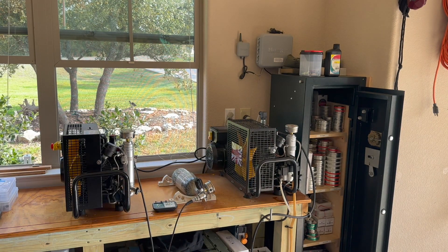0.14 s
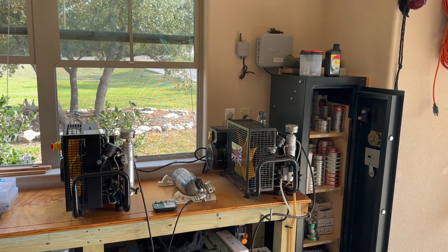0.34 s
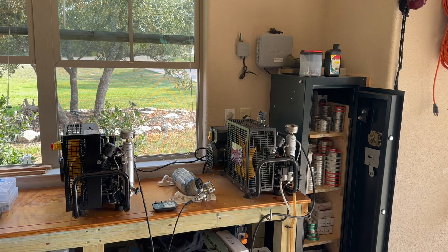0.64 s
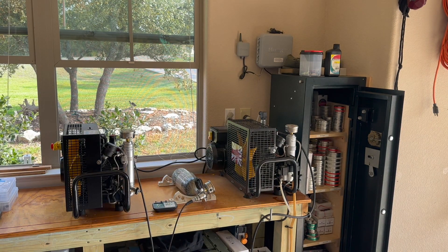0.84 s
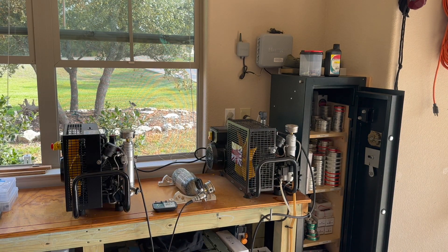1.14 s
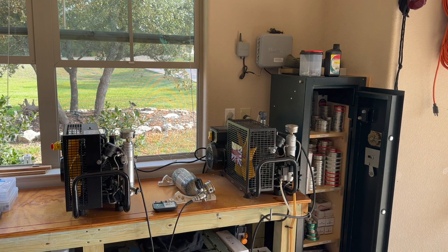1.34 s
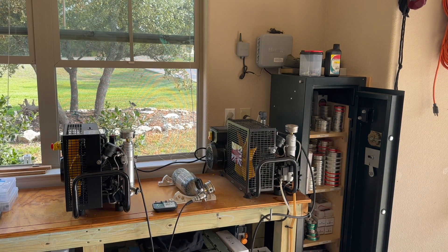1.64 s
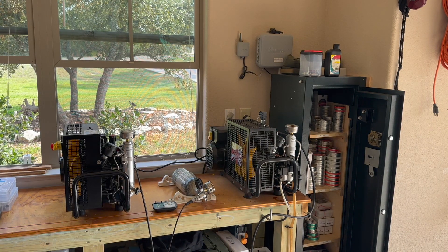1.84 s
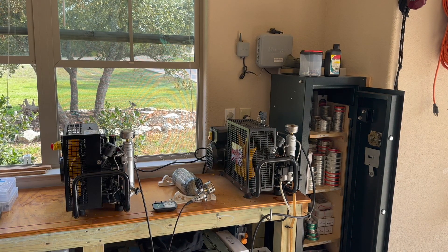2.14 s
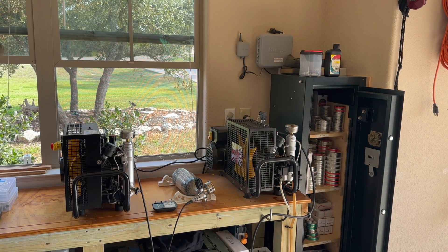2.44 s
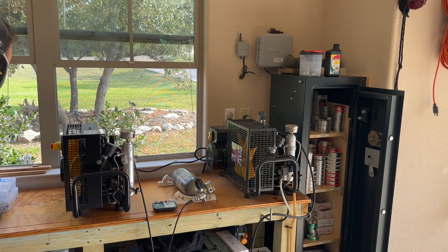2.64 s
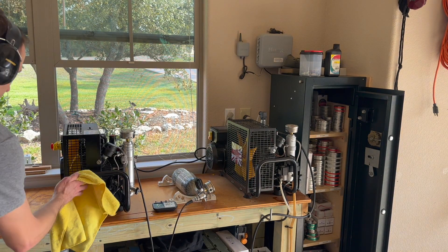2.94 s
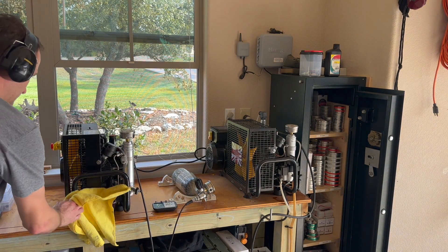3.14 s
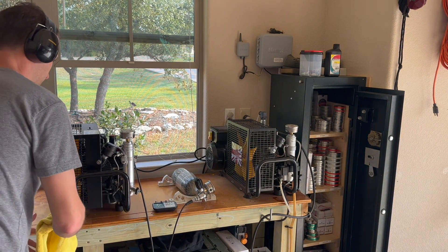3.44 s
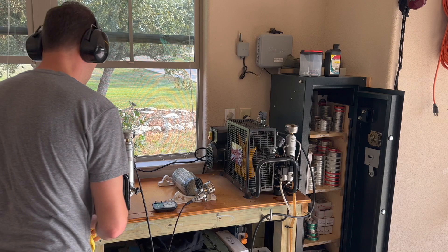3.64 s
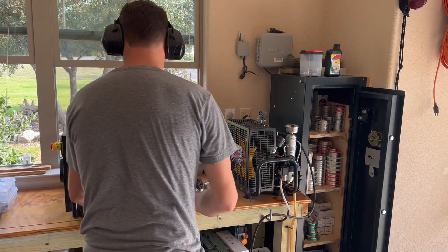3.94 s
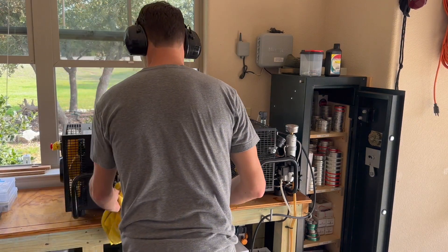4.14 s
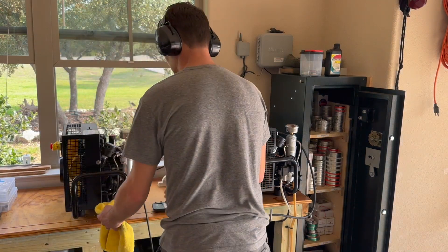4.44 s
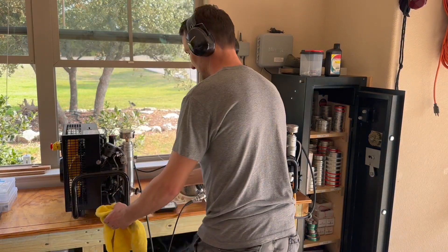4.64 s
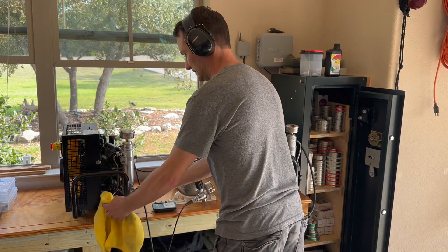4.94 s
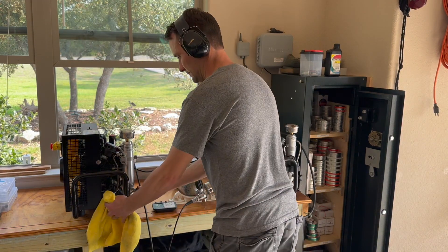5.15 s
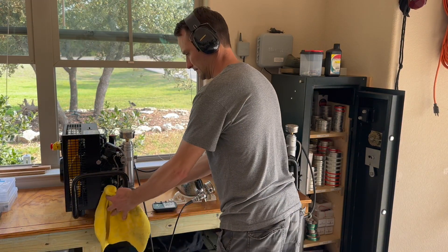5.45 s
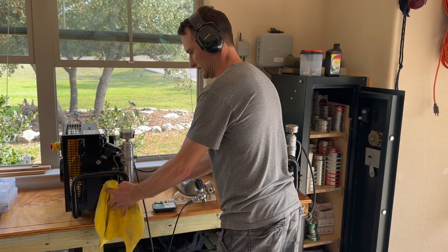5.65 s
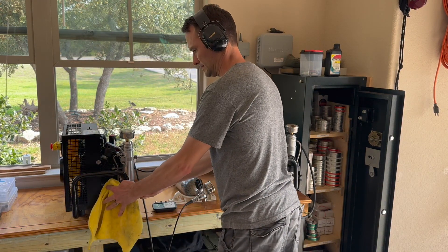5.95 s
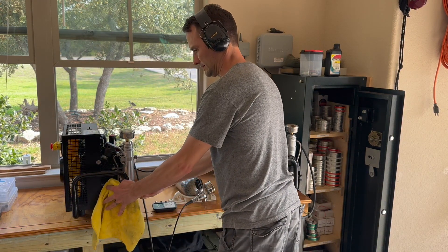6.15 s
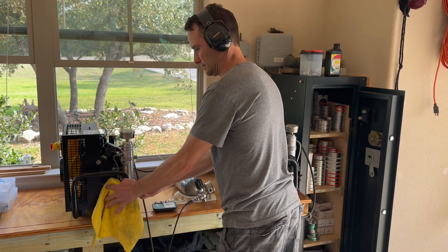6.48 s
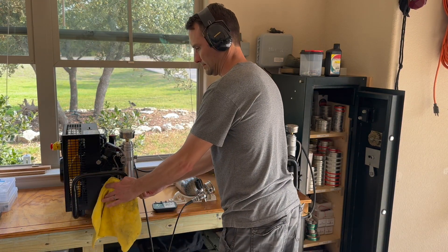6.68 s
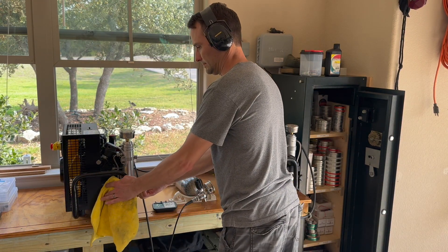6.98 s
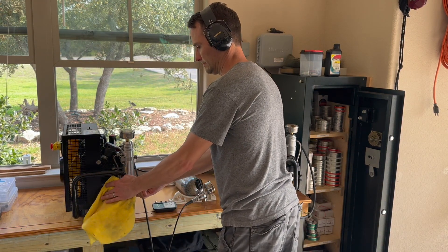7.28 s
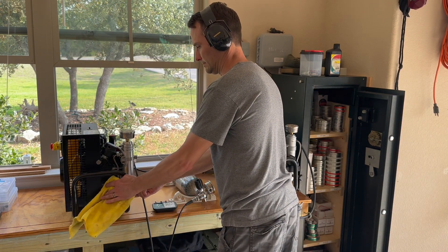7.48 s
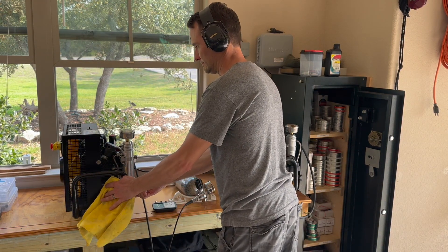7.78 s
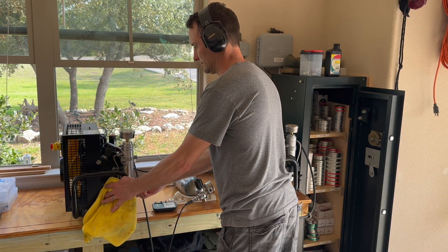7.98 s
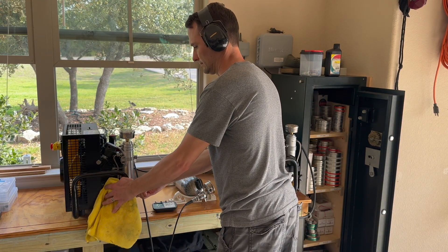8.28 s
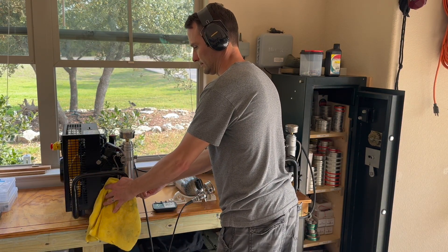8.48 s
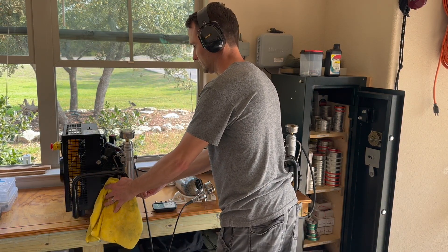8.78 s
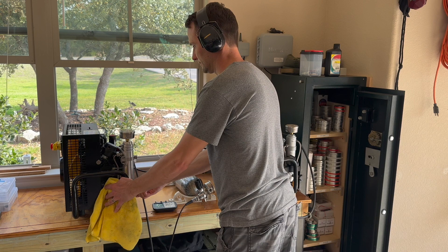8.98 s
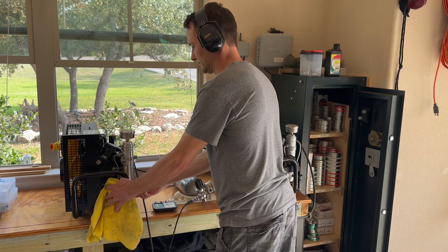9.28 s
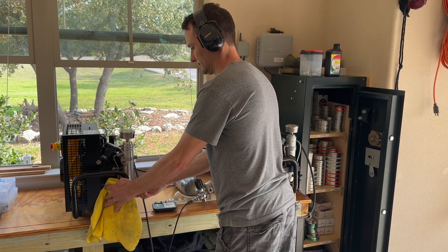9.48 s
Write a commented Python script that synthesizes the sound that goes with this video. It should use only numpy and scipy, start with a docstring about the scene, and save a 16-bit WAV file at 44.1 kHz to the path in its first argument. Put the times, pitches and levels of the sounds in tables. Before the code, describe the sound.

In a small workshop, compressed air blows from a compressor's drain valve in a loud, bright, slightly metallic hiss, captured by a phone a few metres away. Faint thuds and a low rumble lie beneath. Someone steps in front, briefly dulling the treble, with a sharp click around four and a half seconds. Later a cloth enters the jet, with a hard slap and roaring, fluttering gusts while the hiss continues to the end.

```python
"""Air blow-off in a workshop

Compressed air blows off through the drain valve of a compressor on a bench, a few metres from a phone:
turbulent hiss, as bands of noise coloured by the jet and by ringing metal. A person steps in front, shading
the hiss, then holds a cloth into the jet: the colour changes and low noise roars as the air catches it.
Footfalls thud as dying rings; bench and walls echo it all, with a low rumble of noise beneath."""
import sys
import numpy as np
from scipy import signal
from scipy.fft import rfft, irfft, next_fast_len
from scipy.io import wavfile
from scipy.ndimage import uniform_filter1d, map_coordinates

SR = 44100
rng = np.random.default_rng(int(sys.argv[2]) if len(sys.argv) > 2 else 0)


def waveform_to_disk(signal):
    """Save audio, clipped to [-1, 1], as 16-bit WAV at the path in sys.argv[1]."""
    frames = np.transpose(np.atleast_2d(signal))
    scaled = np.clip(frames, -1, 1) * 32767
    samples = np.round(scaled).astype(np.int16)
    wavfile.write(sys.argv[1], SR, samples)


N = 424241
SIZE = next_fast_len(N + SR)  # room for the tail of the echoes
T = np.arange(N) / SR  # seconds
HZ = np.maximum(np.arange(SIZE // 2 + 1) * SR / SIZE, 1)

# Steady buffeting of the bench, and the shop. Each row: time in seconds, roar level in dB before its flapping,
# brightness in dB (added above about 600 Hz, taken off below), rumble level in dB before it wavers.
BUFFETING = [(0, -42, 0.5, -54), (2.2, -39.5, -0.5, -55), (3.9, -42.5, 2, -52.5), (4.8, -41.5, 3, -54),
             (6.9, -37.5, -2.5, -58), (7.6, -42, 0, -51), (8.1, -35, 4.5, -56), (8.9, -41.5, 3.5, -58),
             (8.96, -44, 5.5, -54), (9.03, -48, 9, -55), (9.2, -41, 8, -62), (9.4, -43.5, 5.5, -58),
             (9.62, -44, -1, -65)]


def undb(db):
    """Amplitude ratio of a level: 20 dB is a factor of ten."""
    return 10 ** (np.asarray(db) / 20)


def over_time(table):
    """Linear interpolation in time: each column of (s, value, ..) as one value a sample."""
    s, *columns = np.transpose(table)
    return [np.interp(T, s, column) for column in columns]


def over_hz(table, hz):
    """Interpolation in log frequency: each column of (Hz, value, ..) at the given frequencies."""
    at, *columns = np.transpose(table)
    return [np.interp(np.log(hz), np.log(at), column) for column in columns]


def noise(gain):
    """Spectral shaping: white Gaussian noise times a gain at each frequency."""
    return irfft(rfft(rng.standard_normal(SIZE)) * gain, SIZE)[:N]


def unit(x):
    """Normalisation to a root mean square of 1."""
    return x / np.sqrt(np.mean(x ** 2))


def walk(rate):
    """Slow random modulation: levels drawn at a rate per second, smoothed twice; spread near 1."""
    hold = int(SR / rate)
    levels = np.repeat(rng.standard_normal(N // hold + 1), hold)
    smooth = uniform_filter1d(uniform_filter1d(levels, hold), hold)
    return 1.377 * smooth[:N]


def rumble():
    """Broadband low noise of the shop, whose level wavers by slow random modulation."""
    # Rumble spectrum. Each row: frequency in Hz, relative density in dB.
    rumble_colour = [(12, -43), (20, -11), (70, 7.5), (92, 7.5), (151, -3), (220, -16), (250, -3.5),
                     (320, -1), (550, -120)]
    level_db = over_time(BUFFETING)[2] + 1.7 * walk(4.6)
    return unit(noise(undb(over_hz(rumble_colour, HZ)[0]))) * undb(level_db)


def steps():
    """Impact sound: each blow is an exponentially dying sine mixed with noise in a band round its pitch."""
    # Footfalls, knocks and a slap of the cloth. Each row: start in seconds, onset level in dB,
    # pitch in Hz, time to decay by 60 dB in seconds, share of ring from 0 (rustle) to 1 (clean).
    blows = [(.612, -34, 200, 0.1, .3), (.614, -40, 600, .2, 0), (.742, -36, 480, .07, .1),
             (2.782, -38, 150, 0.13, 0), (4.119, -39, 260, 0.13, 0), (4.454, -28, 480, .035, .8),
             (4.453, -13, 2600, .01, .95), (4.752, -31, 600, .024, .8), (7.365, -19, 1800, .03, .4),
             (7.384, -15, 900, .02, .6), (7.385, -11, 2300, .02, .6), (4.478, -39, 200, 0.1, .3),
             (4.79, -44, 200, .08, 0)]
    out, t = np.zeros(N), T[:SR // 4]
    for s, db, hz, t60, ring in blows:
        band = signal.butter(1, [hz / 2.2, hz * 1.8], "band", fs=SR, output="sos")
        rustle = unit(signal.sosfilt(band, rng.standard_normal(len(t))))
        thud = np.sqrt(2 * ring) * np.sin(2 * np.pi * hz * t) + np.sqrt(1 - ring) * rustle
        attack = np.minimum(t / 0.0005, 1)
        start = int(s * SR)
        out[start:start + len(t)] += thud * undb(db - 60 * t / t60) * attack
    return out


def gusts():
    """Exponential growth and decay: power of the gusts and of their upper edge, summed over the gusts."""
    # The jet catches the cloth. Each row: peak time in seconds, roar level in dB before rounding, brightness
    # and flapping, swell in dB per second, fade in dB per second, level above the split in dB over the rest.
    catches = [(4.1, -40, 58, 62, 0), (6.68, -37, 72, 49, 3), (7.25, -28.5, 45, 30, -3),
               (7.385, -20, 85, 33, 0.5), (7.95, -34, 6.5, 96, -3), (8.87, -32.5, 21, 150, -1),
               (8.915, -31, 70, 600, -8), (9.0, -39.5, 100, 62, -8), (9.56, -31, 250, 60, 0)]
    round_s = 0.012  # averaging blunts the peaks
    power = 0
    for s, db, swell, fade, edge_db in catches:
        fall_db = np.where(T < s, swell * (s - T), fade * (T - s))
        power = power + np.outer([1, undb(edge_db)], undb(db - fall_db)) ** 2
    return uniform_filter1d(power, int(round_s * SR))


def flap():
    """Random amplitude modulation at two rates: uneven flapping."""
    return undb(.6 * walk(25) + 1.1 * walk(70))


def roar():
    """Low turbulent buffeting plus the cloth's gusts, as noise whose halves are weighed by brightness."""
    # Spectrum of the steady buffeting. Each row: frequency in Hz, relative density in dB.
    body_colour = [(35, -41), (60, -22.5), (292, -2.5), (617, 0), (797, -3), (897, -2.5), (1120, -2.5),
                   (2000, -4), (3500, 0), (4550, -43), (7700, -120)]
    # Spectrum of the gusts in the cloth. Each row: frequency in Hz, relative density in dB.
    cloth_colour = [(29, -46), (50, -15), (359, -4.5), (620, -2), (802, -2), (874, -3), (1130, 0),
                    (1560, -3.5), (1950, -1), (2600, -3.5), (3200, -7), (4200, -21), (6600, -120)]
    split_hz = 1800  # the edge of the gusts lies above this
    roar_db, bright_db, _ = over_time(BUFFETING)
    # shares of power
    upper = 1 / (1 + (600 / HZ) ** 2)
    edge = 1 / (1 + (split_hz / HZ) ** 6)

    colour = undb(over_hz(body_colour, HZ)[0])
    dark = undb(-bright_db) * noise(colour * np.sqrt(1 - upper))
    bright = undb(bright_db) * noise(colour * np.sqrt(upper))
    body = unit(dark + bright) * undb(roar_db)

    colour = undb(over_hz(cloth_colour, HZ)[0])
    low = noise(colour * np.sqrt(1 - upper))
    middle = noise(colour * np.sqrt(upper * (1 - edge)))
    high = noise(colour * np.sqrt(upper * edge))
    full, thin = np.sqrt(gusts()) / np.std(low + middle + high)
    cloth = full * (undb(-bright_db) * low + undb(bright_db) * middle) + thin * high
    return body * flap() + cloth * flap()


def shade():
    """Acoustic shadow: treble loss in dB, one smooth Gaussian dip for each crossing."""
    # Body, arm or cloth crossing the line to the phone. Each row: centre in seconds, treble loss in dB,
    # half length in seconds (to 1/e of the loss).
    crossings = [(3.03, 3, 0.1), (4.02, 7.5, 0.15), (4.483, 1.5, .04), (5.01, 4, 0.18), (5.487, 3.5, 0.083),
                 (6.364, 3.5, 0.15), (8.95, 2.5, 0.045)]
    return sum(loss_db * np.exp(-((T - s) / half) ** 2) for s, loss_db, half in crossings)


def jet():
    """Turbulent mixing noise: neighbouring bands gust together and flicker alone, coloured by resonances."""
    # Drift of the hiss. Each row: time in seconds, hiss level in dB before colour and gusting, then in dB
    # over the hiss: 2.5-5 kHz, below 2.5 kHz, above 12 kHz.
    drift = [(0, -17.5, -2.5, -1, 0), (1.1, -19, -0.5, 1.5, 2), (2.3, -18.5, -0.5, 2, 2.5),
             (3.5, -19, -1, 2, 3), (4.5, -20.5, 2.5, 3.5, 4), (4.8, -20, 1.5, 1.5, 5),
             (5.3, -23, 2.5, 8, 7), (5.55, -21, 0.5, 6.5, 6.5), (5.7, -21.5, 4, 5.5, 4),
             (6.1, -17, 1.5, 0.5, -0.5), (6.55, -16, 1, -1, -1), (6.72, -14.5, -2, -2, -2.5),
             (7.0, -17, 1.5, -0.5, -1.5), (7.2, -15, -2, -11, 0.5), (7.5, -15, -4, -1, -1),
             (7.95, -17, -4.5, -6, -0.5), (8.6, -17, -3.5, -1, 1.5), (8.9, -17, -2, -13, 2.5),
             (8.97, -15.5, -6.5, -6, -1), (9.08, -16.5, -4.5, -4, 1.5), (9.17, -15, -4, -6, -3),
             (9.28, -15.5, -4.5, -2, -2.5), (9.45, -15.5, -3.5, -2, -1.5), (9.62, -16, -6, -5, -0.5)]
    # Jet spectrum. Each row: frequency in Hz, gain in dB with the jet free, with the person, with the cloth.
    jet_colour = [(900, -22, -22, -22), (1550, -14, -14.5, -14), (1800, -10, -10, -9), (2350, -9, -8, -6.5),
                  (2550, -4, -3.5, -3), (2950, -4.5, -2, -2), (3150, -1, 0, 0), (4050, -2, -1, 0),
                  (4700, -0.5, -1, 0), (6000, -1.5, -2, 0), (7050, 0.5, -1, 1), (7700, -2.5, -1.5, 0.5),
                  (8600, 1, 1, 2), (9600, -2, -0.5, 0), (10400, -2, -1.5, 0), (11700, -1, -1, -1),
                  (12100, 1.5, 0.5, -1), (13000, 4.5, 3.5, 2), (14000, 1, 1.5, 2), (15000, 1, 1.5, 3),
                  (15600, 3.5, 4, 5)]
    # Valve, frame and bench ring with the jet. Each row: frequency in Hz, width in Hz,
    # boost in dB with the jet free, with the person, with the cloth.
    resonances = [(1350, 60, 4, 2, 0), (1810, 60, 4, 6, 1), (1945, 60, 4, 4, 4), (2200, 60, 1, 4, 2),
                  (2560, 70, 3, 3.5, 1.5), (2760, 60, 5, 1, 2), (3145, 40, 5, 5, 5), (3345, 40, 7, 3, 2),
                  (3610, 30, 5, 3, 2), (3875, 45, 7.5, 3, 2), (4185, 60, 3, 5, 3), (4625, 55, 10, 3, 2),
                  (4830, 60, 5, 5, 1), (5070, 60, 3, 1, 0), (5410, 60, 2, 3, 4), (5615, 35, 5, 3, 5),
                  (5800, 60, 4, 4, 2), (6100, 30, 4, 3, 4), (6390, 70, 4, 5, 4), (6595, 30, 6, 5, 5),
                  (7150, 80, 1, 4, 2), (7410, 70, 0, 3, 1), (7840, 70, 0, 4, 2), (8250, 90, 1, 2, 4),
                  (8630, 80, 3.5, 1.5, 0), (9130, 90, 0, 3, 2), (12790, 80, 2, 2, 1), (12945, 90, 4, 4, 2),
                  (13640, 90, 2, 1, 1), (14490, 100, 3, 2, 2), (14990, 80, 2, 1, 1), (15550, 90, 2, 1, 2)]
    # Who is at the valve. Each row: time in seconds, stage (0 jet free, 1 person close in front,
    # 2 cloth pressed into the jet).
    stages = [(0, 0), (3.65, 0), (3.9, 1), (4.2, 1), (4.35, .6), (4.8, .6), (4.95, 1), (6.6, 1), (6.85, 2),
              (9.62, 2)]
    flicker_db, flicker_rate = .75, 22  # spread in dB, draws per second

    hiss_db, lower_db, body_db, top_db = over_time(drift)
    ring_db = sum(np.outer(dbs, 1 / (1 + (2 * (HZ - hz) / width) ** 2)) for hz, width, *dbs in resonances)
    colours = undb(over_hz(jet_colour, HZ) + ring_db)
    # crossfade between the colours of neighbouring stages
    stage = over_time(stages)[0]
    shares = np.array([np.maximum(1 - abs(stage - k), 0) for k in range(len(colours))])

    gust_db = 0.34 * walk(18) + 0.54 * walk(45)
    loss_db = shade()
    edges_hz = [-SR, 1500, 2500, 3700, 5000, 6500, 8200, 10000, 12000, 14000, SR]
    follows = [body_db, body_db, lower_db, lower_db, 0.71 * lower_db, 0, 0, .5 * top_db, top_db, top_db]
    # the longer waves suffer a smaller share of the loss
    shaded = [.47, .47, .49, .49, .8, 1, 1, 1, 1, 1]
    out = 0
    for lo, hi, follow_db, share in zip(edges_hz, edges_hz[1:], follows, shaded):
        # bands overlap over 600 Hz at constant power
        band = np.clip(np.minimum(HZ - lo, hi - HZ) / 600 + .5, 0, 1) ** .5
        seed = rfft(rng.standard_normal(SIZE)) * band
        hiss = np.sum(shares * irfft(seed * colours, SIZE)[:, :N], axis=0)
        level_db = hiss_db + follow_db - share * loss_db + gust_db
        out = out + hiss * undb(level_db + flicker_db * walk(flicker_rate))
    return out


def bounced(x):
    """Comb-filter interference with a later copy off the person; peaks and dips slide as the path changes."""
    # Reflection off the moving body. Each row: time in seconds, extra path in metres,
    # level in dB relative to the direct sound.
    reflection = [(3.2, 1.2, -30), (3.7, .8, -10), (4.1, .45, -8), (4.5, .7, -9), (4.9, .5, -11),
                  (5.4, .66, -13), (5.8, .5, -12), (6.6, .6, -16), (7.4, .5, -17), (8.6, .58, -17),
                  (9.62, .5, -18)]
    metres, db = over_time(reflection)
    late = map_coordinates(x, [(T - metres / 343) * SR], order=5, mode="mirror")  # sound at 343 m/s
    return (x + undb(db) * late) / np.sqrt(1 + undb(db) ** 2)


def path():
    """Room response: spectrum of direct sound, echoes and decaying tail; and the phases of a second tail."""
    # Bench and wall echoes. Each row: delay in seconds, level in dB relative to the direct sound.
    echoes = [(.0036, -19.5), (.0041, -40), (.0052, -18.5)]
    t60_s, tail_db, tail_start_s = .4, -13, .006  # tail energy in dB relative to the direct sound
    t = T[:SR // 2]
    tails = rng.standard_normal((2, len(t))) * undb(-60 * t / t60_s) * (t > tail_start_s)
    response = unit(tails[0]) / np.sqrt(len(t)) * undb(tail_db)
    response[0] = 1
    for s, db in echoes:
        response[int(s * SR)] += undb(db)
    response /= np.sqrt(np.sum(response ** 2))
    return rfft(response, SIZE), np.exp(1j * np.angle(rfft(tails[1], SIZE)))


def scene():
    """Superposition of the sources in two channels with partial coherence between them."""
    # The two channels. Each row: frequency in Hz, likeness from 0 to 1, left minus right in dB.
    ports = [(60, .98, 0), (150, .97, .5), (300, .91, 1), (700, .6, 1.4), (1400, .6, 0), (2600, .5, 2),
             (3500, .4, 4), (7400, .4, 5), (8200, .85, 0), (9600, .7, 0), (10400, 1, 0), (11800, 1, 0),
             (12700, .8, 0), (13700, 1, 0), (15000, 1, 0), (15700, .7, 0)]
    # Phase of the right channel against the left: mirror image at 10.4-11.8 kHz, alike at 13.7-15 kHz.
    # Each row: frequency in Hz, lead in turns.
    lead = [(60, 0), (700, -.1), (2000, -.1), (3000, -.3), (4600, .15), (7400, -.3), (8000, 0), (9100, .06),
            (10400, .5), (11800, .5), (13700, 1), (15000, 1), (15600, 1.15)]
    # the scattered sound wanders in time, so that its interference with the rest does not stand still
    drift_s = .00012
    dry = rfft(rumble() + steps() + roar() + bounced(jet()), SIZE)
    like, pan_db = over_hz(ports, HZ)
    like = np.clip(like, 0, 1)
    left, scattered = path()
    # the right hears the same path turned in phase, plus scattered sound of its own
    right = like * left * np.exp(2j * np.pi * over_hz(lead, HZ)[0])
    gains = np.array([left * undb(pan_db / 2), right * undb(-pan_db / 2)])
    out = irfft(dry * gains, SIZE)[:, :N]
    own = irfft(dry * np.sqrt(1 - like ** 2) * scattered * undb(-pan_db / 2), SIZE)[:N]
    out[1] += map_coordinates(own, [(T + drift_s * walk(6)) * SR], order=5, mode="mirror")
    return out


def record(dry):
    """Band limiting: the phone drops the deep bass gently and cuts the top steeply."""
    bass_hz, top_hz = 51.4, 15700
    thin = signal.sosfilt(signal.butter(2, bass_hz, "high", fs=SR, output="sos"), dry)
    return signal.sosfilt(signal.ellip(14, .2, 80, top_hz, fs=SR, output="sos"), thin)


dry = scene()
out = record(dry)
waveform_to_disk(out)
```